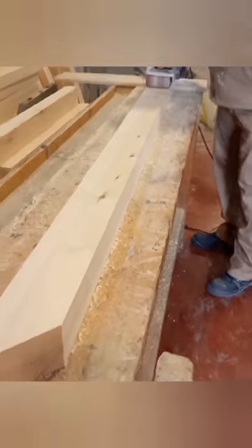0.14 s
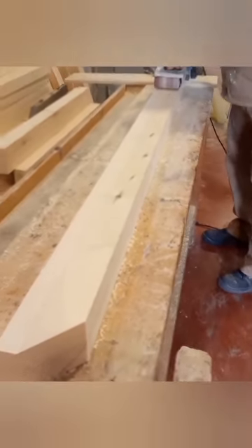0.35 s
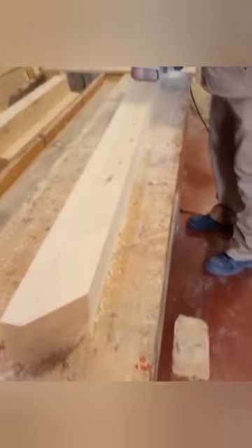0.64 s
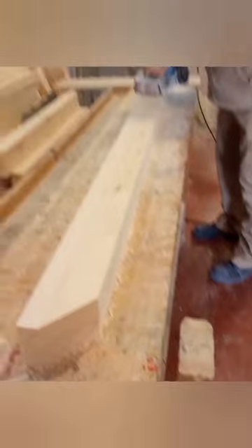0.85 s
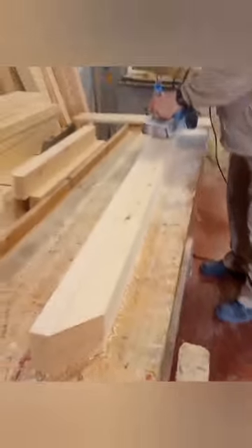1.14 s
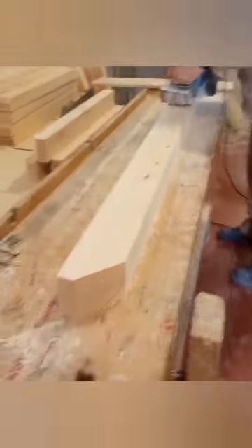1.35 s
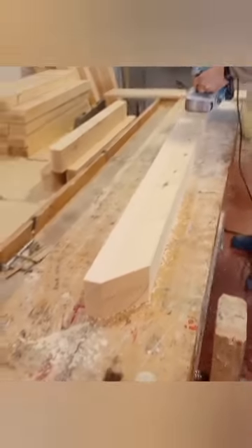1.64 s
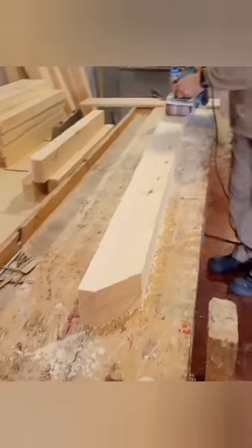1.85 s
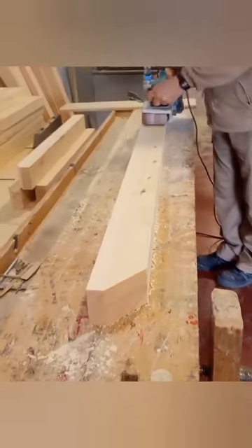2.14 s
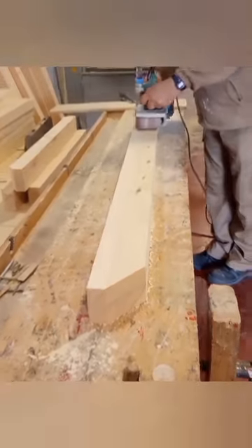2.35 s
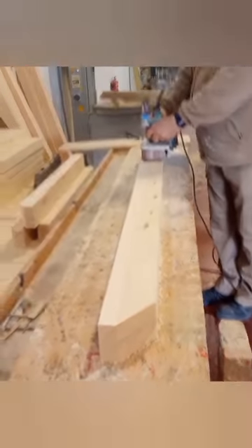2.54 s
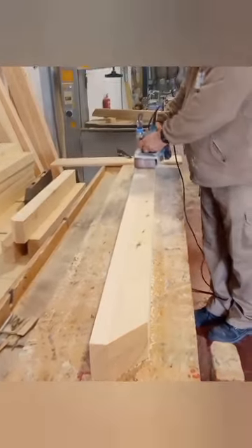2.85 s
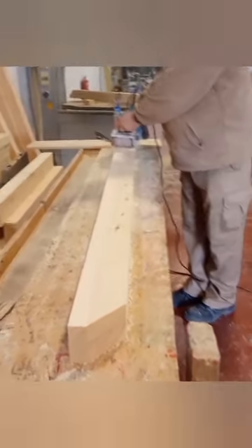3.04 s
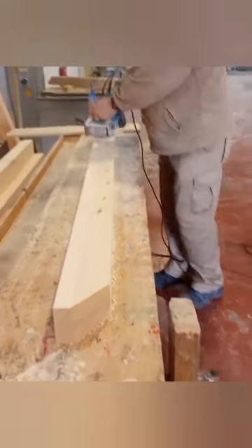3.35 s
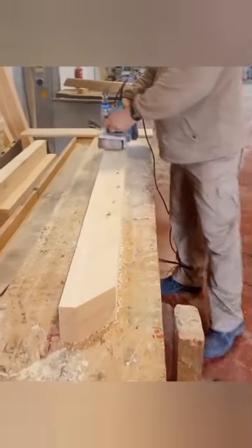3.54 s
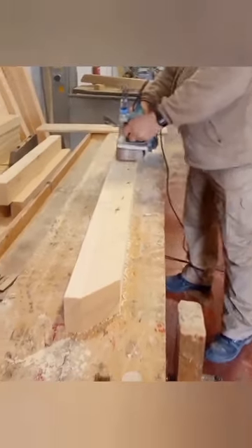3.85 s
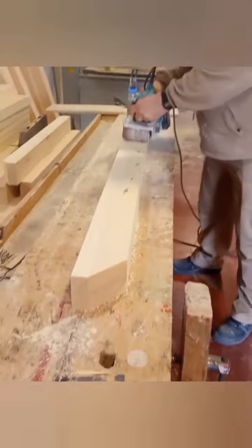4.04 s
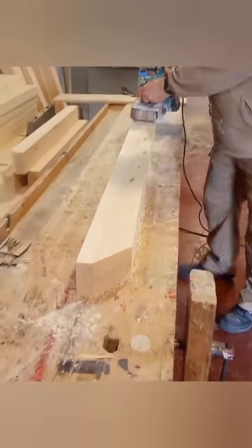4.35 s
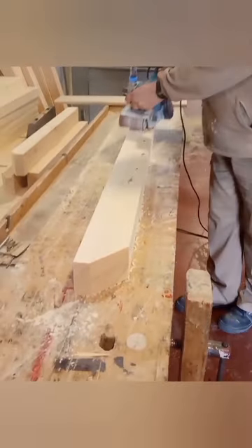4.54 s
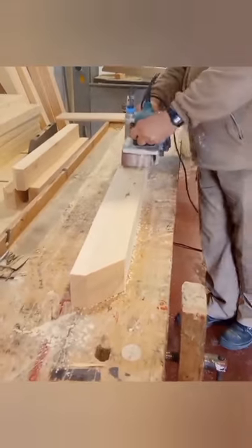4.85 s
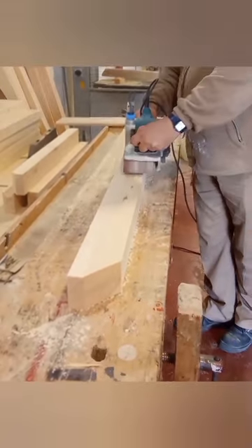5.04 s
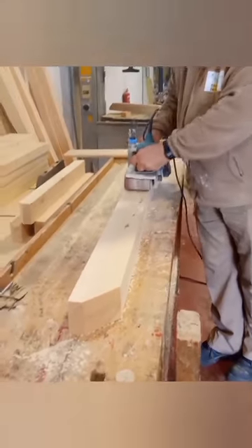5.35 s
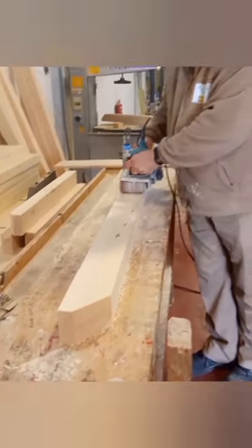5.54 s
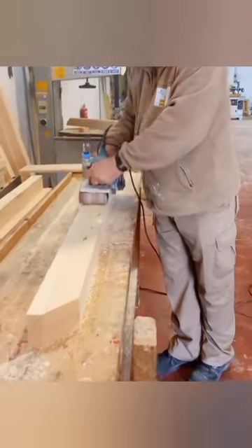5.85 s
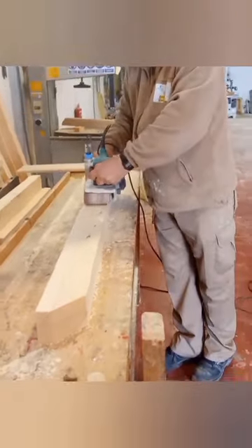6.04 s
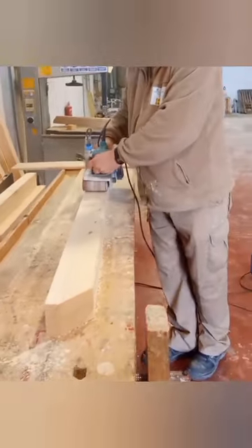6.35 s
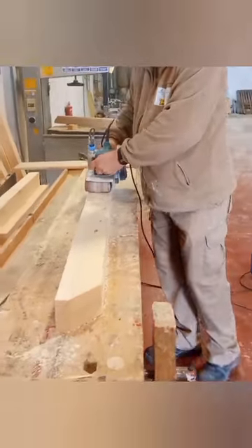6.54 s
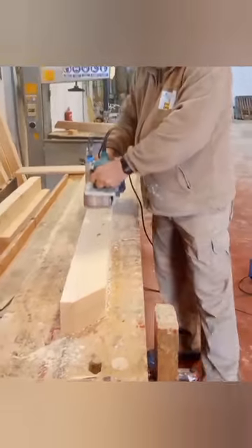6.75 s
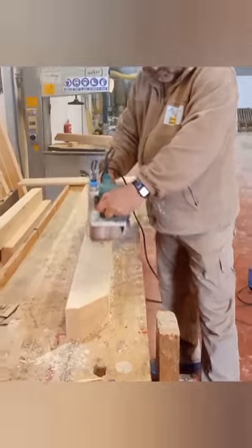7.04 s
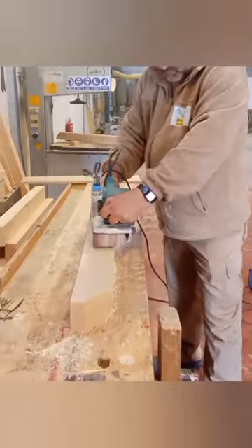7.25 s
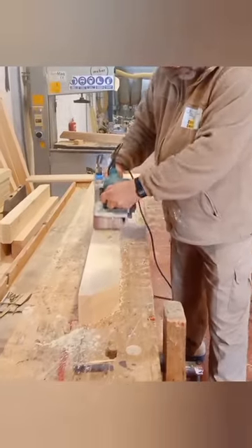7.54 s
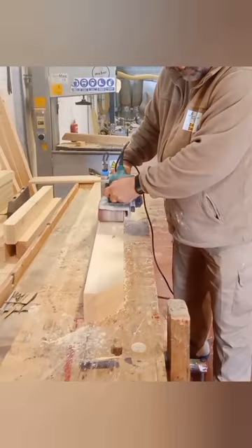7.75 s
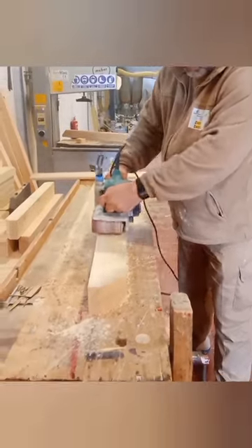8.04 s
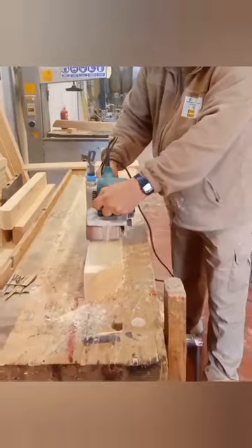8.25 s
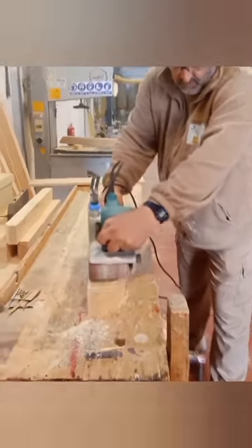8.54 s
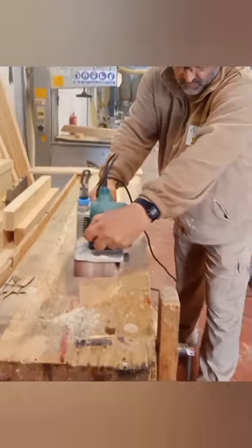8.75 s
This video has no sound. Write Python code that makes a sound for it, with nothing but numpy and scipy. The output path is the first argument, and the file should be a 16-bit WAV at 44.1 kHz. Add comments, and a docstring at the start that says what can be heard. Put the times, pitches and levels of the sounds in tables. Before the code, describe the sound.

A loud electric hand planer whines steadily and piercingly in a workshop, sagging and rasping as it makes short strokes along a wooden beam.

```python
"""An electric hand planer is pushed along a wooden beam in a workshop, in short strokes.
Each stroke loads the motor, so the whine (four overtones of one pitch) sags; drive tones and a drum hum join it.
Coloured noises make the rasping blades, the rumbling bench, the rattling beam and the hiss of air and chips.
A puff of air closes most strokes. The overtones slide through the housing's resonances
and fade at random among the room's echoes."""
import sys
import numpy as np
from scipy import signal
from scipy.io import wavfile
from scipy.ndimage import uniform_filter1d

SR = 44100
rng = np.random.default_rng(int(sys.argv[2]) if len(sys.argv) > 2 else 0)


def log_audio(samples):
    """Write samples as a 16-bit WAV file to the path given in sys.argv[1]."""
    # one column per channel
    frames = np.atleast_2d(samples).T
    # limit to full scale, then quantise
    limited = np.clip(frames, -1, 1)
    pcm = np.round(limited * 32767).astype(np.int16)
    wavfile.write(sys.argv[1], SR, pcm)


N = 392931
TIME = np.arange(N) / SR

# strokes of the blades through the wood: (start [s], end [s], load on the motor [0-1],
# change of the rasp [dB], change of the chip hiss [dB], closing change of the air [dB])
STROKES = [(0.028, .52, 0.19, 1.5, -1.5, -1.5), (1.097, 1.387, 0.26, 1, 2.5, 2.5),
           (1.481, 1.899, .02, 0, 2.5, -1), (2.149, 2.617, 0.32, 2, 0.5, 2.5),
           (3.229, 3.911, .49, 2.8, 2.2, 2), (4.441, 5.17, .5, 5, 2, 3.5),
           (5.662, 6.219, 0.29, 5.5, 1, 2.5), (6.8, 7.33, .47, 6, 4, 3.5), (8.19, 8.991, 0.64, 5.5, 4, -1)]
# colour of the beam's rattle: (frequency [Hz], level [dB per Hz])
RATTLE_COLOUR = [(60, -36.5), (170, -29), (240, -14), (330, -12), (410, -7), (490, -8), (600, -2),
                 (680, -5), (790, -0.5), (1200, -7), (2000, -7), (5000, -70)]


def gain_of(db):
    """Turns decibels into amplitude."""
    return 10 ** (np.asarray(db) / 20)


def evened(x):
    """Scales a signal to an rms of 1."""
    return x / np.sqrt(np.mean(abs(x) ** 2) + 1e-20)


def curve(rows, column=1):
    """One column of a table, joined by straight lines in time."""
    rows = np.asarray(rows)
    return np.interp(TIME, rows[:, 0], rows[:, column])


def read(points, hz):
    """A table over frequency, joined by straight lines on a log-frequency axis."""
    f, value = np.transpose(points)
    return np.interp(np.log(hz + 1), np.log(f + 1), value)


def bump(at, width_s):
    """A smooth rise and fall of height 1."""
    return np.exp(-np.minimum(((TIME - at) / width_s) ** 2, 20))


def lagged(x, lag_s):
    """Follows x with some inertia."""
    keep = np.exp(-1 / (lag_s * SR))
    return signal.lfilter([1 - keep], [1, -keep], x)


def drift(width_hz, size=4096):
    """Slow complex chance of rms about 1, changing about width_hz times a second."""
    hz = np.fft.fftfreq(size, N / SR / size)
    chance = rng.standard_normal(size) + 1j * rng.standard_normal(size)
    spectrum = chance / (1 + (hz / width_hz) ** 2)
    points = evened(np.fft.ifft(spectrum))[:, None]
    # straight lines from each point to the next
    ramp = np.linspace(0, 1, N // size + 1, endpoint=False)
    return (points + (np.roll(points, -1) - points) * ramp).ravel()[:N]


def turbulence(colour, patchy_db, flicker_db, frames_size, bins_size):
    """Coloured noise of rms 1: patches some frames long and bins wide, and a quick flicker of all pitches."""
    frames, hz = N // 256 + 5, np.fft.rfftfreq(1024, 1 / SR)
    real, imaginary, patches = rng.standard_normal((3, frames, len(hz)), dtype=np.float32)
    patches = uniform_filter1d(patches, size=frames_size, axis=0)
    patches = evened(uniform_filter1d(patches, size=bins_size, axis=1))
    flicker = evened(uniform_filter1d(rng.standard_normal((frames, 1)), size=4, axis=0))
    level_db = read(colour, hz) + patchy_db * patches + flicker_db * flicker
    spectrum = (real + 1j * imaginary) * gain_of(level_db)
    noise = signal.istft(spectrum.astype(np.complex64).T, nperseg=1024, noverlap=768)[1]
    return evened(noise[:N])


def strokes(column):
    """Press, hold and lift of every stroke, as high as one column of its row."""
    press_s, lift_s = 0.06, 0.15  # the blades enter and leave the wood
    total = 0
    for row in STROKES:
        corners = [row[0], row[0] + press_s, row[1], row[1] + lift_s]
        total = total + row[column] * np.interp(TIME, corners, [0, 1, 1, 0])
    return total


def catches(column):
    """Gain where the blades catch in hard grain: a sudden start, a short hold and a quick decay."""
    # (start [s], time until the decay [s], rattle level [dB], rasp level [dB])
    hard_grain = [(0.058, 0.11, -34, -28.5), (0.852, 0.15, -41, -28), (1.286, 0.077, -33.5, -25.5),
                  (1.84, .14, -29, -34), (3.63, .14, -36, -40), (4.6, 0.12, -33, -38),
                  (8.147, .08, -29.5, -23)]
    attack_s, decay_s = 0.0095, 0.087
    total = 0
    for row in hard_grain:
        start = np.clip((TIME - row[0]) / attack_s, 0, 1)
        decay = np.exp(-np.maximum(TIME - row[0] - row[1], 0) / decay_s)
        total = total + gain_of(row[column]) * start * decay
    return total


def loaded(level, load, away):
    """Gain of a noise that follows the load and the way the planer faces."""
    idle_db, load_db, away_db = level
    return gain_of(idle_db + load_db * load + away_db * away)


def workshop(x):
    """Sparse echoes of random sign come back from the room, the treble dying first."""
    # ring of the workshop: (frequency [Hz], time to fall by 60 dB [s])
    ring_time = [(150, 0.81), (1500, 0.87), (5000, 0.7), (14000, 0.23)]
    taps = rng.choice([-1., 1.], SR) * (rng.random(SR) < 2000 / SR)  # about 2000 echoes in one second
    hz, t, spectrum = signal.stft(taps, SR, nperseg=256)
    decay = gain_of(-60 * t / read(ring_time, hz)[:, None])
    tail = signal.istft(spectrum * decay, SR, nperseg=256)[1]
    return signal.fftconvolve(x, tail / np.linalg.norm(tail))[:N]


def outlet(strain, away):
    """The fan blows air and fine chips out of the housing; the colour shifts as the outlet swings round."""
    # rush of air with the outlet facing us, then facing away: (frequency [Hz], level [dB per Hz])
    facing_colour = [(1000, -51), (2600, -24.5), (3300, 1), (3900, 3), (4550, 8), (5200, -3.5), (5800, -15),
                     (7000, -33), (12000, -49)]
    away_colour = [(1000, -40), (2600, -11), (3550, 1), (4300, -4), (5000, -4), (5750, -5), (7000, -17),
                   (10500, -38), (15600, -48)]
    # hiss of the chips: (frequency [Hz], level [dB per Hz])
    chip_colour = [(2000, -24.5), (4500, -9.5), (5500, 5), (6600, 4), (7300, 0), (8200, -1.5), (9400, -6.5),
                   (10000, -16), (12000, -24), (14000, -35), (15600, -41)]
    # air: (idle level [dB], rise at full load [dB], rise while facing away [dB])
    air_level = (-27.5, 1.2, 4.2)
    chip_idle_db, chip_away_db, chip_lag_s = -35.5, 4, 0.17
    puff_delay_s, puff_s = 0.071, 0.2  # the outlet blows clear as each stroke ends

    front = turbulence(facing_colour, patchy_db=2.5, flicker_db=1.2, frames_size=16, bins_size=5)
    back = turbulence(away_colour, patchy_db=2.5, flicker_db=1.2, frames_size=16, bins_size=5)
    air = np.sqrt(1 - away) * front + np.sqrt(away) * back
    chips = turbulence(chip_colour, patchy_db=2.8, flicker_db=1.0, frames_size=30, bins_size=3)
    puffs_db = sum(puff_db * bump(end + puff_delay_s, puff_s) for _, end, *_, puff_db in STROKES)
    air_gain = loaded(air_level, strain, away) * gain_of(puffs_db)
    spray_db = lagged(strokes(column=4), chip_lag_s)
    chip_gain = gain_of(chip_idle_db + spray_db + chip_away_db * away)
    return air_gain * air + chip_gain * chips


def knocks(t60, per_s, count=30):
    """Torn fibres knock at random; each knock rings one of the beam's many modes (per_s knocks a mode)."""
    t = np.arange(SR // 5) / SR
    out = np.zeros(N + len(t))
    modes_hz = np.geomspace(350, 1300, count) * rng.uniform(.98, 1.02, count)
    for hz in modes_hz:
        fall = gain_of(read(RATTLE_COLOUR, hz) - 60 * t / t60)
        ring = fall * np.sqrt(hz) * t * np.sin(2 * np.pi * hz * t)
        for at in rng.integers(0, N, round(per_s * N / SR)):
            out[at:at + len(t)] += rng.standard_normal() * ring
    return evened(out[:N])


def cut(load, away, uneven_db):
    """The blades tear the wood: the bench rumbles, the beam rattles and the edges rasp above it."""
    # dull rumble of the bench under the beam, then rasp of the edges: (frequency [Hz], level [dB per Hz])
    bench_colour = [(45, -33), (80, -19.5), (100, -15), (130, -0.5), (170, 3), (220, -7), (400, -16),
                    (2000, -59)]
    rasp_colour = [(300, -47), (1000, -27.5), (1350, -3), (1650, -2.5), (1850, 4.5), (2200, -0.5),
                   (2700, -5), (3300, -7.5), (4500, -17.5), (12000, -42)]
    # bench, then beam: (idle level [dB], rise at full load [dB], rise while the outlet faces away [dB])
    bench_level = (-64, 4, 9.9)
    rattle_level = (-36.5, 2.3, 3.3)
    rasp_idle_db, rasp_away_db, rasp_lag_s = -31, 3, 0.1

    rumble = turbulence(bench_colour, patchy_db=5, flicker_db=3.0, frames_size=14, bins_size=2)
    scrub = turbulence(RATTLE_COLOUR, patchy_db=4.0, flicker_db=2.5, frames_size=20, bins_size=2)
    rattle = evened(scrub + 0.85 * knocks(t60=0.082, per_s=9))
    rasp = turbulence(rasp_colour, patchy_db=3.0, flicker_db=0.4, frames_size=20, bins_size=4)
    bite_db = lagged(strokes(column=3), rasp_lag_s)
    steady_rasp = gain_of(rasp_idle_db + bite_db + rasp_away_db * away)
    # the catches add their power to the steady noises
    rattle_gain = np.hypot(loaded(rattle_level, load, away), catches(column=2))
    rasp_gain = np.hypot(steady_rasp, catches(column=3))
    wood = loaded(bench_level, load, away) * rumble + rattle_gain * rattle + rasp_gain * rasp
    return wood * gain_of(uneven_db * drift(23).real)


def drum(angle, level_db, rough):
    """The slightly unbalanced cutter drum shakes the beam once a turn."""
    # hum of the drum, before level_db is added: (time [s], level [dB])
    hum_level = [(0, -38), (.5, -51), (1.5, -41.5), (2, -55), (2.9, -43), (3.4, -42), (4, -64),
                 (4.8, -56.5), (5.4, -45.5), (6.3, -48.5), (6.6, -64), (7.05, -44.5), (8.9, -49.5)]
    shake = (1 + rough * drift(20.5)) * np.exp(1j * 0.189 * angle)  # turns per cycle of the whine: 0.189
    return gain_of(curve(hum_level) + level_db) * evened(shake.real)


def drive(angle, load, away, rough, fade_db):
    """Two tones of the belt drive that grow with the load, and come and go."""
    # (multiple of the whine pitch, idle level [dB], rise at full load [dB],
    # rise while the outlet faces away [dB], lag behind the load [s])
    belt_tones = [(.625, -45, 11.5, 5, 0.019), (1.439, -42.5, 10, 4, 0.2)]
    out = np.zeros(N)
    for ratio, idle_db, load_db, away_db, lag_s in belt_tones:
        roughness = 1 + rough * drift(10)
        fading = gain_of(fade_db * drift(1).real)
        tone = roughness * fading * np.exp(1j * ratio * angle)
        level_db = idle_db + load_db * lagged(load, lag_s) + away_db * away
        out += gain_of(level_db) * evened(tone.real)
    return out


def side_tones(angle, level_db, fade_hz, blur):
    """Weaker tones geared to the motor, belt and bearings, each fading in and out on its own."""
    # (multiple of the whine pitch, level before level_db is added [dB])
    geared_tones = [(0.085, -60), (.379, -47), (0.917, -47), (1.084, -39), (1.19, -42), (1.268, -44),
                    (1.41, -51), (1.527, -45), (1.647, -43), (1.814, -38.5), (1.915, -39.5), (2.08, -38.5),
                    (2.411, -52), (2.475, -51), (2.917, -37.5), (3.083, -40.5), (3.476, -43),
                    (4.085, -43.5), (4.916, -45.5), (5, -57), (6, -57), (7, -60)]
    out = np.zeros(N)
    for multiple, db in geared_tones:
        fading = drift(fade_hz) + blur * drift(24.0)
        out += gain_of(db + level_db) * (fading * np.exp(1j * multiple * angle)).real
    return out * np.sqrt(2 / (1 + blur ** 2))


def rotation(speed, wobble_hz):
    """Phase of the whine; the grain of the wood makes the speed tremble."""
    return 2 * np.pi * np.cumsum(speed + wobble_hz * drift(16.0).real) / SR


def whine(angle, speed, fade_db, fade_hz, flutter, flutter_hz, rough, rough_hz):
    """Air chopped by the spinning parts: four overtones that fade, flutter and carry a skirt of roughness."""
    # first and fourth overtone, before the swells: (time [s], level [dB])
    first_level = [(0, -31.5), (.28, -20.5), (.85, -24.5), (1.7, -24.5), (2.5, -21), (2.8, -25),
                   (4.1, -23.5), (5, -22), (5.25, -35.5), (5.6, -27), (6.9, -28.5), (7.25, -36), (8.2, -31),
                   (8.38, -19.5), (8.9, -29.5)]
    fourth_level = [(0, -43), (.9, -34), (2, -30), (3.4, -24.5), (3.68, -32.5), (4.35, -23), (5, -37),
                    (6.75, -36), (6.95, -25), (7.45, -25), (7.9, -28), (8.25, -21.5), (8.9, -34)]
    # housing resonances, before the swells: (whine pitch [Hz], second overtone [dB], third overtone [dB])
    housing = [(1544, -35, -22.5), (1538, -23, -20.5), (1550.7, -22.5, -23), (1577.5, -18, -23.5),
               (1582.6, -19.5, -27.5), (1703, -28, -34.5), (1709, -31, -33), (1732, -28, -24)]
    # one overtone swells or drops out: (time [s], which overtone [1-4], half length [s], change [dB])
    swell_list = [(0.183, 3, 0.049, 8), (0.396, 1, 0.044, -10), (0.635, 2, 0.086, 9.5), (0.656, 3, .13, 7),
                  (1.03, 2, 0.066, 8), (1.529, 2, 0.074, 8), (1.64, 1, 0.055, -15), (1.949, 3, 0.079, 3),
                  (2.0, 2, 0.07, 9.5), (2.95, 2, 0.096, 5), (3.074, 3, 0.068, -19), (3.212, 1, .07, 7.5),
                  (3.433, 3, 0.18, -13.5), (3.582, 2, 0.072, 3.5), (3.776, 2, 0.089, -7.5),
                  (4.006, 2, 0.056, -17), (4.067, 3, 0.11, 4), (4.337, 2, .06, 3.5), (4.366, 3, 0.074, -11),
                  (4.572, 2, .08, -5.5), (4.8, 2, 0.045, -1), (5.05, 2, 0.061, -17), (5.299, 4, 0.076, 8),
                  (5.657, 2, 0.094, 3.5), (5.815, 2, .025, -16), (6.015, 1, 0.066, -22), (6.55, 2, .09, 6),
                  (6.833, 3, 0.056, -8), (6.924, 1, 0.058, 7.5), (7.623, 1, .03, 15), (7.75, 1, .07, -8),
                  (7.887, 2, .09, 4), (7.902, 1, .05, 9), (8.051, 3, 0.1, 4), (8.321, 2, 0.088, -14)]
    # how deeply the echoes cancel each of the four overtones: (factor on fade_db) for each
    fade_share = (2.44, 0.73, 0.54, 1.8)

    pitch, second, third = np.transpose(housing)
    second_level, third_level = np.interp(speed, pitch, second), np.interp(speed, pitch, third)
    levels = [curve(first_level), second_level, third_level, curve(fourth_level)]
    out = np.zeros(N)
    for k, db in enumerate(levels, 1):
        swells = sum(size_db * bump(at, half_s) for at, which, half_s, size_db in swell_list if which == k)
        cancelling = gain_of(-fade_db * fade_share[k - 1] * drift(fade_hz).real ** 2)
        fluttering = cancelling * (1 + flutter * drift(flutter_hz))
        unsteady = evened(fluttering + rough * drift(rough_hz))
        out += gain_of(db + swells) * np.sqrt(2) * (unsteady * np.exp(1j * k * angle)).real
    return out


def scene():
    """The strokes load the motor, the load shapes its speed and the noises; the room answers."""
    # how far the outlet has swung round to face us: (time [s], share [0-1])
    facing = [(2.2, 0.36), (2.58, 0.54), (2.62, 1)]
    # pitch of the whine with no load: (time [s], pitch [Hz])
    free_speed = [(0, 1746), (2.1, 1686), (2.42, 1672), (2.82, 1599), (4.35, 1608), (5.5, 1585),
                  (7.85, 1579), (8.9, 1573)]
    motor_lag_s, sag_hz = 0.25, 99.5  # inertia of the rotor; drop of the whine at full load

    load = strokes(column=2)
    away = 1 - np.clip(curve(facing), 0, 1)
    strain = lagged(load, motor_lag_s)
    speed = curve(free_speed) - sag_hz * strain
    angle = rotation(speed, wobble_hz=2.006)
    planer = whine(angle, speed, fade_db=2.5, fade_hz=8.9, flutter=0.29, flutter_hz=26.0, rough=0.23, rough_hz=71)
    planer = planer + side_tones(angle, level_db=-1.5, fade_hz=2.5, blur=0.88)
    planer = planer + drive(angle, load, away, rough=0.71, fade_db=4.0)
    planer = planer + drum(angle, level_db=-1.0, rough=1.27)
    planer = planer + cut(load, away, uneven_db=0.5)
    planer = planer + outlet(strain, away)
    return (planer + gain_of(-13.5) * workshop(planer))[None]


def record(dry):
    """A steep low-pass filter takes away the highest treble."""
    edge_hz = 15700
    low_pass = signal.firwin(511, edge_hz, window=("kaiser", 9), fs=SR)
    return signal.oaconvolve(dry, low_pass[None], "same")


dry = scene()
out = record(dry)
log_audio(out)
```